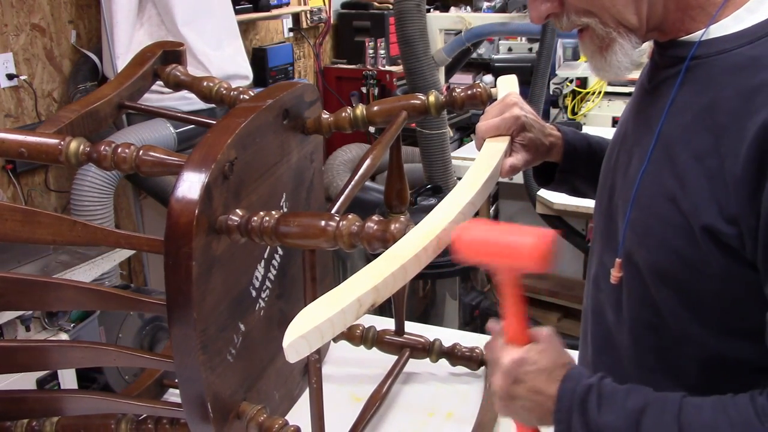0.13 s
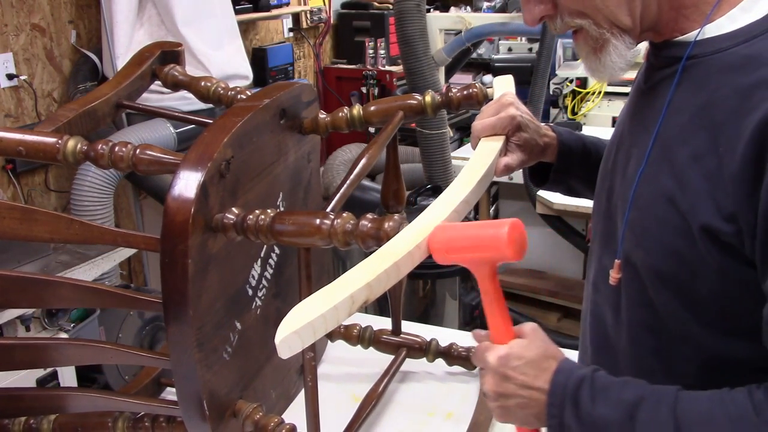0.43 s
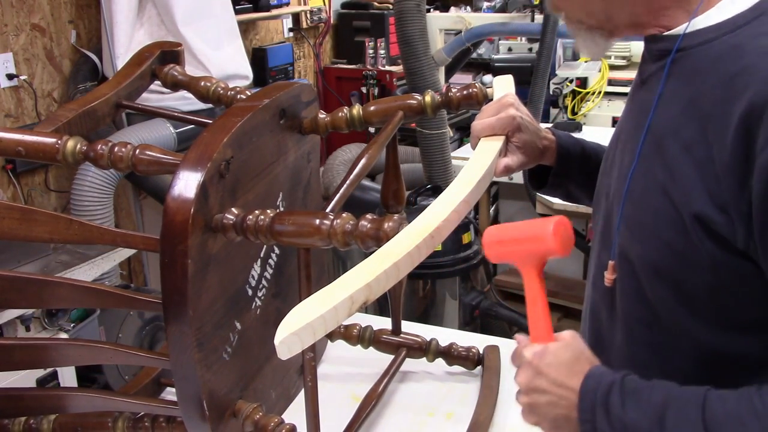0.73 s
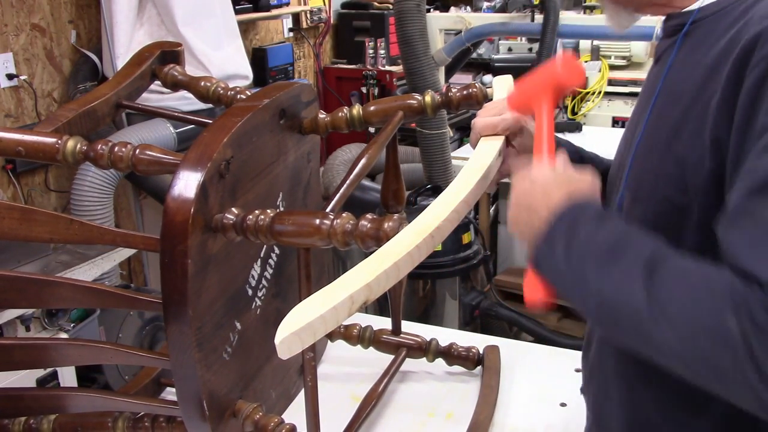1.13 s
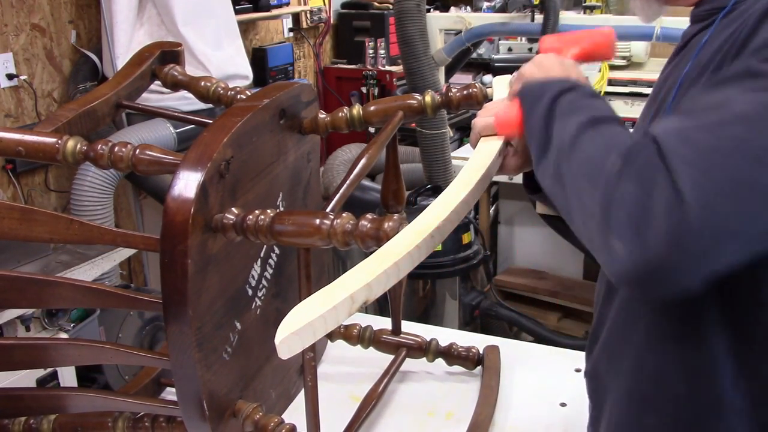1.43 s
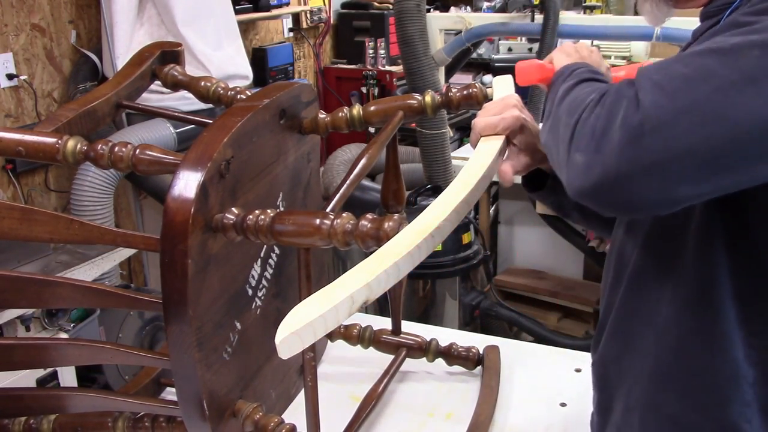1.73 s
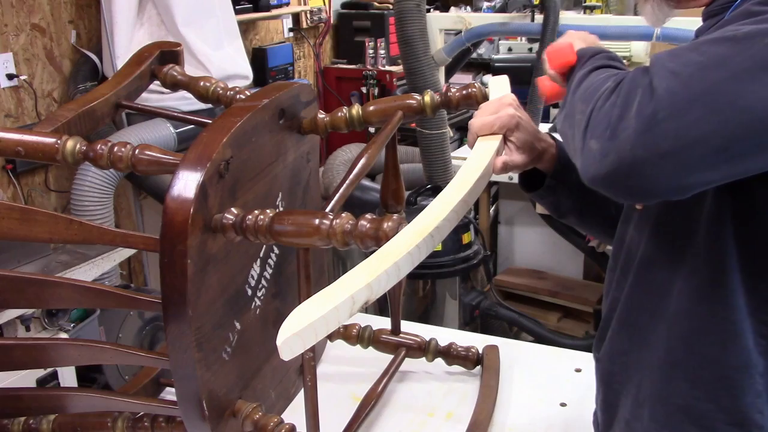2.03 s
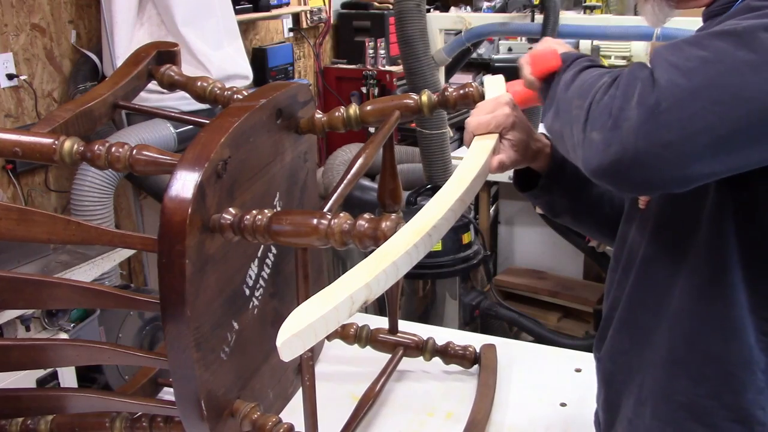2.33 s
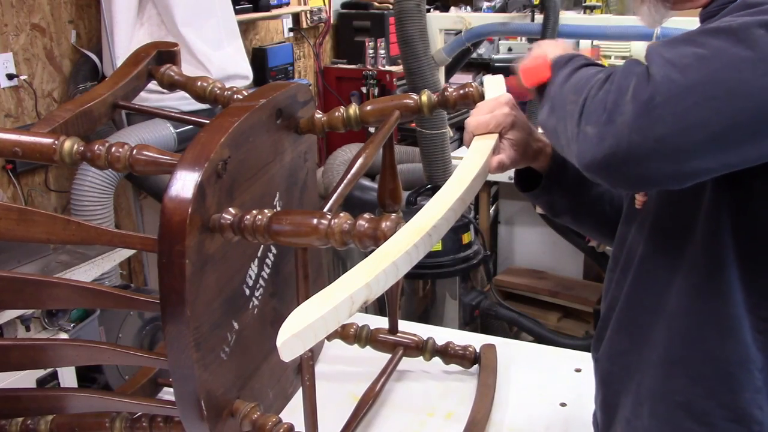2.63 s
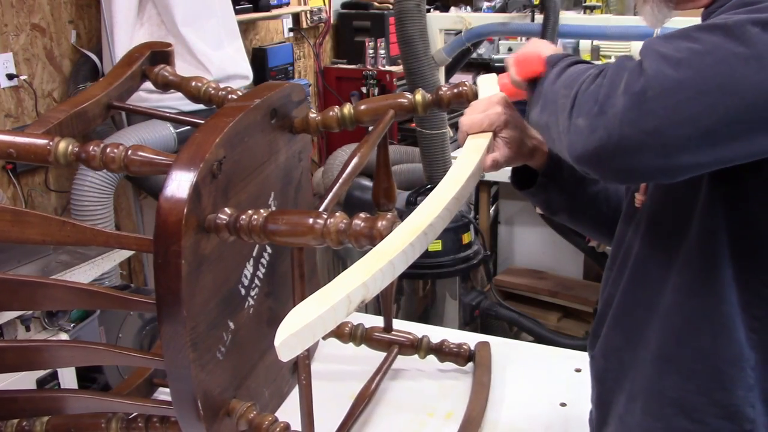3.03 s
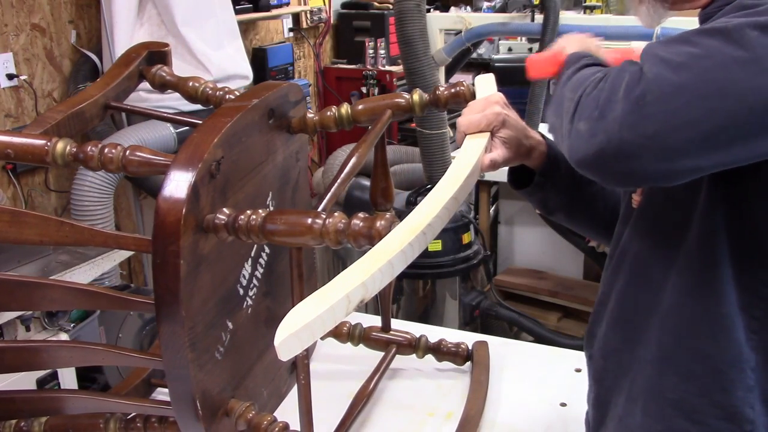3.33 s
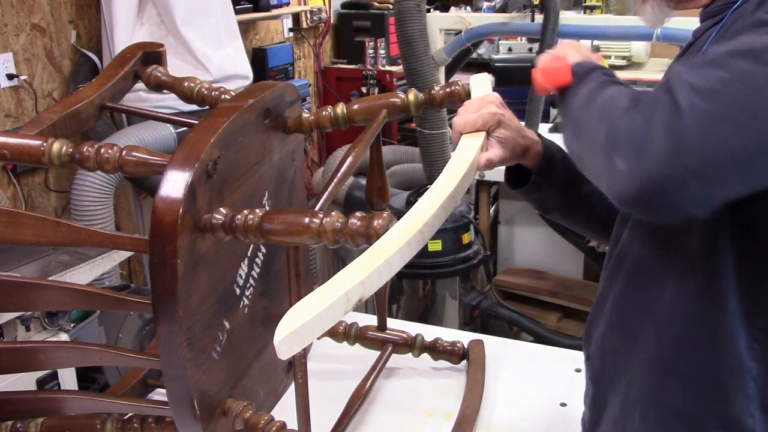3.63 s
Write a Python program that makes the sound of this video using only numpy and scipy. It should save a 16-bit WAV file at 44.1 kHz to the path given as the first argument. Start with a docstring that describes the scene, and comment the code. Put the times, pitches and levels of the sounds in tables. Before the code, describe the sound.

A rubber mallet strikes a wooden chair part: two hard blows, a pause with a faint knock, two lighter taps, then three driving blows, close to the microphone in a small workshop with low hum.

```python
"""A sleeve swishes and a rubber mallet drives a wooden rocker onto the leg of an upturned chair in a small workshop.
Two hard blows come first, then a pause with a light knock, two setting taps and three driving blows.
Swelling hiss makes the swishes; each blow is a crack, noise bands and sine modes for chair and room, and metal buzz.
Air noise and a wavering hum lie beneath; the recorder's limiter flattens hard blows into short roars."""
import sys
import numpy as np
from scipy import signal
from scipy.io import wavfile
from scipy.ndimage import uniform_filter1d, minimum_filter1d

SR = 44100
rng = np.random.default_rng(int(sys.argv[2]) if len(sys.argv) > 2 else 0)


def put_to_file(sound):
    """Save the sound as 16-bit audio at rate SR, in the file named by the first command-line argument."""
    columns = np.atleast_2d(sound).T  # one column per channel
    safe = np.clip(columns, -1, 1)
    whole_steps = np.round(safe * 32767)
    wavfile.write(sys.argv[1], SR, whole_steps.astype(np.int16))


N = 167580
TIME = np.arange(N) / SR
AGE = np.arange(SR * 3 // 4) / SR  # seconds since a blow
BAND_EDGES = 30 * 2 ** np.arange(0, 9.2, 1 / 3)  # third octaves, Hz
CENTRES = np.sqrt(BAND_EDGES[1:] * BAND_EDGES[:-1])
TREBLE_HZ = 2060  # corner of the treble shelf and pivot of the crack's slope
MODE_BUILD_S = 0.0047  # time constant of the swell in frame and metal


def amp(db):
    """Decibels to gain."""
    return 10 ** (np.asarray(db) / 20)


def unit(x):
    """Scale to rms 1."""
    return x / np.sqrt(np.mean(x ** 2) + 1e-20)


def at_hz(points, hz):
    """Read a table on a log-frequency axis."""
    f, v = np.transpose(points)
    return np.interp(np.log(hz), np.log(f), v)


def dying(t60):
    """Exponential decay after a blow, 60 dB in t60 seconds."""
    return amp(-60 * AGE / t60)


def build():
    """Smooth swell as energy from the blow spreads."""
    return 1 - np.exp(-AGE / MODE_BUILD_S)


def add(out, s, sound):
    """Mix a sound in at time s."""
    i = int(s * SR)
    out[:, i:i + sound.shape[-1]] += sound[..., :N - i]


def stereo(pair, hz):
    """Left and right from a mid and a side noise; the side level follows frequency."""
    # Stereo width. Each row: frequency in Hz, side relative to mid in dB.
    side_level = [(40, -0.5), (220, -25.5), (1000, -21), (4000, -14.5), (8000, -13), (14000, -9.5)]
    side = amp(at_hz(side_level, hz)) * pair[1]
    return pair[0] + side * np.array([[1], [-1]])


def noise_bands(size):
    """Third-octave stereo noises from two white pairs: bands x 2 x size."""
    lead = SR // 10  # lets the filters settle
    white = rng.standard_normal((2, 2, size + lead))
    bands = []
    for k, hz in enumerate(CENTRES):
        band_pass = signal.butter(2, BAND_EDGES[k:k + 2], "band", fs=SR, output="sos")
        noise = signal.sosfilt(band_pass, white[k % 2])[:, lead:]
        bands.append(stereo(unit(noise), hz))
    return np.array(bands)


def band_gains(spectrum):
    """Gain of each band for a spectrum, total power 1."""
    gains = amp(at_hz(spectrum, CENTRES)) * np.sqrt(CENTRES)
    return gains / np.linalg.norm(gains)


def mix_bands(gains, bands):
    """Weighted sum of the noise bands."""
    return np.tensordot(gains, bands, 1)


def narrow_noise(hz, width_hz, size):
    """Stereo noise passed twice through one resonance; the width is that of a single pass."""
    b, a = signal.iirpeak(hz, hz / width_hz, fs=SR)
    white = rng.standard_normal((2, size + SR // 2))
    tone = signal.lfilter(b, a, signal.lfilter(b, a, white))
    return stereo(unit(tone[:, -size:]), hz)


def workshop():
    """Steady air noise and a low hum: a narrow noise stripped of its swells, so only its phase wavers."""
    # Air noise. Each row: frequency in Hz, relative density in dB per Hz.
    air = [(30, -56), (60, -45), (85, -12), (115, -12), (170, -9.5), (330, -4), (500, -6), (650, -13.5),
           (900, -13), (1300, -16.5), (2200, -23), (5000, -29), (10000, -35.5), (15500, -45)]
    # Hum. Each row: time in seconds, level in dB.
    hum_level = [(0, -57), (.8, -66), (1.0, -58), (1.4, -55.5), (2.0, -60.5), (2.5, -62), (3.8, -64.5)]
    air_db, hum_hz, hum_width_hz = -52.5, 114.5, 2
    phase = np.angle(signal.hilbert(narrow_noise(hum_hz, hum_width_hz, N)[0]))
    hum = np.sqrt(2) * np.cos(phase) * amp(np.interp(TIME, *np.transpose(hum_level)))
    return amp(air_db) * mix_bands(band_gains(air), noise_bands(N)) + hum


def sleeve():
    """Cloth hisses in a smooth swell with a soft pitch as the arm swings."""
    # Swishes. Each row: middle in seconds, half length (bell deviation) in seconds, level in dB,
    # treble tilt in dB, soft pitch in Hz.
    swishes = [(0.0, 0.03, -40.5, -6.5, 6060), (0.343, 0.0064, -32, -2.5, 5980),
               (0.361, 0.045, -46.5, -4, 6060), (1.453, 0.058, -69, 5, 6100),
               (1.91, 0.066, -55.5, -2.5, 2880), (2.33, 0.058, -49.5, -1.5, 2850),
               (2.696, 0.038, -48, -2.5, 2760), (3.054, 0.041, -49, -0.5, 2890),
               (3.448, 0.056, -49, 0, 2880)]
    # Hiss of the cloth. Each row: frequency in Hz, relative density in dB per Hz.
    cloth = [(300, -25.5), (1800, -9), (3200, -21), (4800, -11), (6100, -2), (8000, -10.5), (10500, -7),
             (15500, -24.5)]
    tone_width_hz, tone_db = 600, -2
    bands, out = noise_bands(N), np.zeros((2, N))
    for s, half_s, db, treble_db, hz in swishes:
        tilt = amp(treble_db * np.tanh(2 * np.log2(CENTRES / 4500)))
        hiss = mix_bands(band_gains(cloth) * tilt, bands)
        tone = amp(tone_db) * narrow_noise(hz, tone_width_hz, N)
        swell = np.exp(-.5 * ((TIME - s) / half_s) ** 2)
        out += amp(db) * swell * (hiss + tone)
    return out


def colour(hz, bass_db, treble_db, spot_hz, spot_db, frame_hz=400, frame_db=0, hard_db=0):
    """How the place and firmness of the contact weight each frequency: two shelves and three humps."""
    bass_hz, hard_hz = 314, 2620
    spot_octaves, frame_octaves, hard_octaves = .22, .22, 0.73
    total_db = bass_db / (1 + (hz / bass_hz) ** 4) + treble_db / (1 + (TREBLE_HZ / hz) ** 2)
    humps = [(spot_hz, spot_db, spot_octaves), (frame_hz, frame_db, frame_octaves),
             (hard_hz, hard_db, hard_octaves)]
    for centre, db, octaves in humps:
        total_db = total_db + db * np.exp(-.5 * (np.log2(hz / centre) / octaves) ** 2)
    return amp(total_db)


def ring_envelopes(crack_db):
    """Per band: a brief crack, then a ring that builds over a few cycles and dies into a faint late tail."""
    # Dense ring of wood and room. Each row: frequency in Hz, relative density in dB per Hz.
    ring_spectrum = [(40, -49), (80, -21), (130, -11.5), (200, -3.5), (450, 0.5), (900, 0), (1200, -5.5),
                     (1800, -7.5), (2800, -13), (4000, -20.5), (5200, -28), (6500, -28.5), (8000, -33.5),
                     (10000, -33), (12000, -50), (15500, -53)]
    # Decay of that ring. Each row: frequency in Hz, t60 in seconds.
    ring_decay = [(60, 0.41), (200, 0.33), (600, 0.26), (1500, 0.34), (4000, 0.38), (8000, 0.29),
                  (15000, 0.073)]
    ring_db, build_cycles = -4.5, 4.1
    late_db, late_t60_s = -32.5, 0.44
    crack_s, crack_db_per_octave = 0.0026, -1.5
    crack_low_hz, crack_top_hz = 300, 11200  # no bass in the crack; the rubber head dulls its top
    late, crack_decay = amp(late_db) * dying(late_t60_s), np.exp(-AGE / crack_s)
    envelopes = []
    for gain, hz in zip(band_gains(ring_spectrum), CENTRES):
        ring = amp(ring_db) * dying(at_hz(ring_decay, hz))
        slope_db = crack_db_per_octave * np.log2(hz / TREBLE_HZ)
        crack_limits = 1 + (crack_low_hz / hz) ** 2 + (hz / crack_top_hz) ** 10
        crack = amp(crack_db + slope_db) * crack_decay / crack_limits
        rise = 1 - np.exp(-AGE * hz / build_cycles)
        envelopes.append(gain * rise * (ring + late + crack))
    return np.array(envelopes)[:, None]


def tock(hz):
    """The struck spot sounds a few strong cycles, damped by the hand."""
    level_db, rise_s, t60_s = 8.5, 0.0015, 0.027
    rise = 1 - np.exp(-(AGE / rise_s) ** 2)
    return amp(level_db) * np.sin(2 * np.pi * hz * AGE) * rise * dying(t60_s)


def linger(hz):
    """The struck spot's pitch hangs on in the frame as a band of noise."""
    level_db, width_hz, t60_s = -20, 510, 0.44
    return amp(level_db) * narrow_noise(hz, width_hz, len(AGE)) * build() * dying(t60_s)


def chair_modes(contact):
    """The frame's modes swell and ring, each varied a little at random in strength and pitch from blow to blow."""
    # Modes of the chair. Each row: nominal frequency in Hz, nominal relative level in dB.
    chair = [(100, -32), (150, -25), (175, -17.5), (264, -14.5), (340, -22), (403, -12), (476, -13.5),
             (578, -19), (697, -17), (851, -14.5), (1003, -21.5), (1268, -14.5), (1384, -25.5), (1497, -26),
             (1559, -18), (1794, -16.5), (1944, -26.5), (2018, -22.5), (2654, -21.5)]
    modes_db, t60_s = -5, .34
    spread_db, detune = 1.2, .008  # deviations of level and of pitch ratio
    modes = 0
    for hz, db in chair:
        strength = amp(db + spread_db * rng.normal()) * colour(hz, *contact)
        pitch_hz = hz * (1 + detune * rng.normal())
        modes = modes + strength * np.sin(2 * np.pi * pitch_hz * AGE + 2 * np.pi * rng.random())
    return amp(modes_db) * build() * dying(t60_s) * modes


def thump():
    """A brief low thud as the whole chair takes the push."""
    pitch_hz, decay_s = 56.3, 0.0066
    return np.sin(2 * np.pi * pitch_hz * AGE) * np.exp(-AGE / decay_s)


def metal_buzz():
    """Shaken metal chatters unevenly in a few high resonances."""
    # Loose metal. Each row: frequency in Hz, single-pass width in Hz, relative level in dB.
    metal = [(5950, 120, 2), (6170, 600, 1.5), (6414, 160, 4), (7655, 310, -6.5), (8610, 220, -9),
             (12320, 120, -16.5), (12500, 91, -26), (14280, 500, -24)]
    t60_s, rough_db, rate_hz = 0.28, 4.5, 68.6  # rate of new random chatter levels
    points = SR // 100
    chatter = np.interp(AGE * rate_hz, np.arange(points), rng.standard_normal(points))
    tones = unit(sum(amp(db) * narrow_noise(hz, width, len(AGE)) for hz, width, db in metal))
    return tones * amp(rough_db * chatter) * dying(t60_s) * build()


def mallet():
    """Blows and light knocks excite the same chair and room; part of each blow's ring is new."""
    # Mallet blows. Each row: start in seconds, force in dB, crack in dB, thump in dB, metal buzz in dB,
    # bass in dB, treble in dB, pitch of the struck spot in Hz, its emphasis in dB,
    # pitch of the flexing frame in Hz, its emphasis in dB, hardness in dB. Force scales the whole blow.
    blows = [(0.0514, 9, 8.5, -40, -19, -0.5, -1, 1386, 3, 382, 3.5, 3.5),
             (0.3974, 10, 2.5, -39, -24.5, -3, -2.5, 1368, 4.5, 704, 4, 3.5),
             (1.9388, -8.5, 16.5, -35, -48, -2, 0, 813, 0, 488, 5, -2),
             (2.3474, -6, 9, -48, -29.5, 3.5, 2, 1565, 4.5, 297, 8.5, -4),
             (2.7302, 6, 5, -24, -28, -2.5, -2.5, 960, -2.5, 446, 4.5, -1),
             (3.0991, 8.5, 2, -13.5, -30, -2.5, -2.5, 947, 0, 454, 3, 1),
             (3.4774, 8.5, 6, -13, -27.5, -1.5, 0.5, 984, 0.5, 446, 3, 1)]
    # Light knocks of wood as the grip shifts. Each row: start in seconds, level in dB.
    knocks = [(1.092, -42), (1.105, -38.5)]
    same_path = 0.69  # share of ring power common to all blows
    # keeps the blows' ring lean below 95 Hz
    low_cut = signal.butter(2, 95, "high", fs=SR, output="sos")
    out, shared = np.zeros((2, N)), noise_bands(len(AGE))
    for s, force_db, crack_db, thump_db, buzz_db, *contact in blows:
        fresh = noise_bands(len(AGE))
        noise = np.sqrt(same_path) * shared + np.sqrt(1 - same_path) * fresh
        ring = mix_bands(colour(CENTRES, *contact), ring_envelopes(crack_db) * noise)
        spot_hz, spot_db = contact[2:4]
        spot = tock(spot_hz) + amp(spot_db) * linger(spot_hz)
        wood = signal.sosfilt(low_cut, ring + spot + chair_modes(contact))
        add(out, s, amp(force_db) * (wood + amp(thump_db) * thump() + amp(buzz_db) * metal_buzz()))
    knock_colour = colour(CENTRES, bass_db=7, treble_db=3.5, spot_hz=1490, spot_db=-0.5)
    knock = mix_bands(knock_colour, ring_envelopes(crack_db=15) * shared)
    for s, db in knocks:
        add(out, s, amp(db) * knock)
    return out


def scene():
    """Everything that reaches the microphone."""
    return workshop() + sleeve() + mallet()


def excess(level, limit_db, db_per_s):
    """Decibels above a limit, let go at a steady rate."""
    over = np.maximum(20 * np.log10(np.abs(level) + 1e-9) - limit_db, 0)
    return np.maximum.accumulate(over + db_per_s * TIME) - db_per_s * TIME


def smooth(x, seconds):
    """One-pole smoothing with a time constant."""
    keep = np.exp(-1 / (seconds * SR))
    return signal.lfilter([1 - keep], [1, -keep], x)


def record(dry):
    """A fast compressor holds loud sound, a limiter catches peaks, then deep bass and top are cut."""
    hold_db, attack_s, detect_s, release_db_per_s = -10, 0.0012, 0.0081, 329
    ceiling, peak_release_db_per_s = 0.87, 5002.5
    low_cut_hz, top_cut_hz = 62, 16400
    level = np.sqrt(smooth(np.mean(dry ** 2, axis=0), detect_s))
    held = dry * amp(-smooth(excess(level, hold_db, release_db_per_s), attack_s))
    cut_db = excess(np.abs(held).max(axis=0) / ceiling, 0, peak_release_db_per_s)
    # the centred window starts each cut just ahead of its peak
    limited = held * amp(uniform_filter1d(minimum_filter1d(-cut_db, size=15), size=15))
    lean = signal.sosfilt(signal.butter(2, low_cut_hz, "high", fs=SR, output="sos"), limited)
    return signal.sosfilt(signal.cheby2(12, 70, top_cut_hz, fs=SR, output="sos"), lean)


dry = scene()
out = record(dry)
put_to_file(out)
```